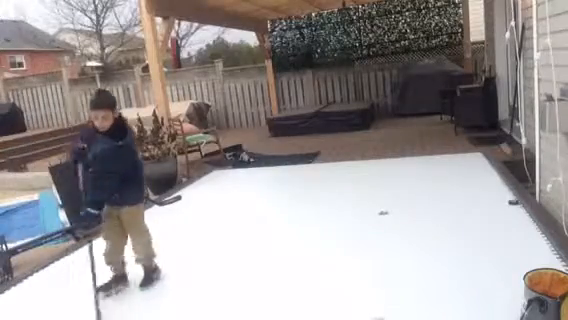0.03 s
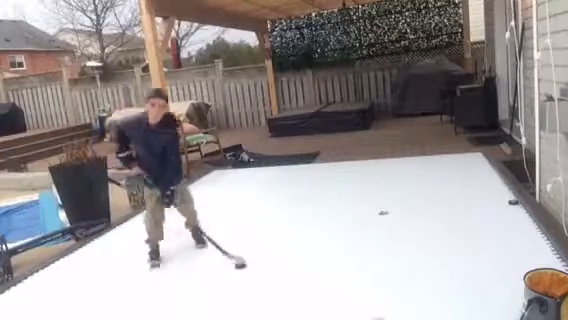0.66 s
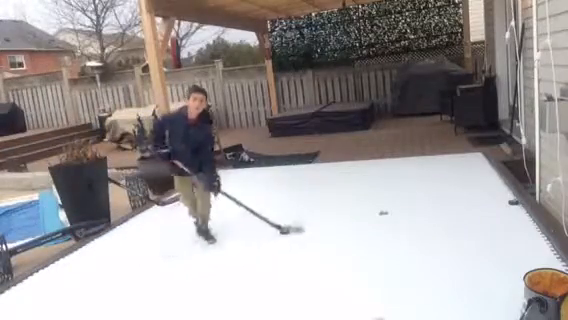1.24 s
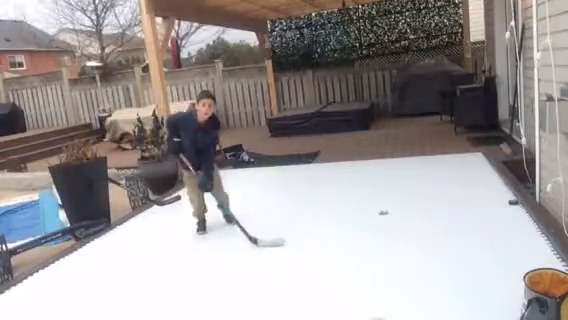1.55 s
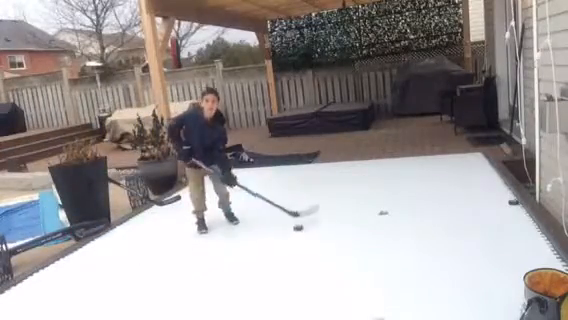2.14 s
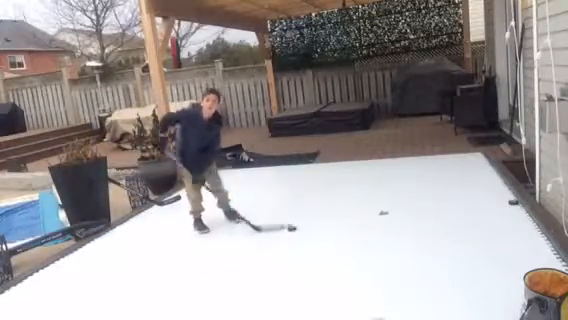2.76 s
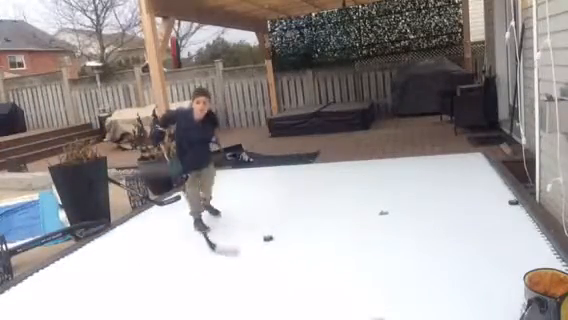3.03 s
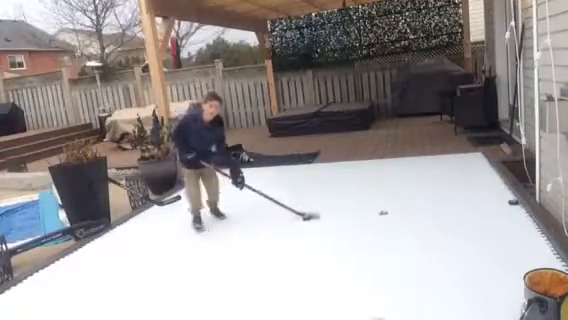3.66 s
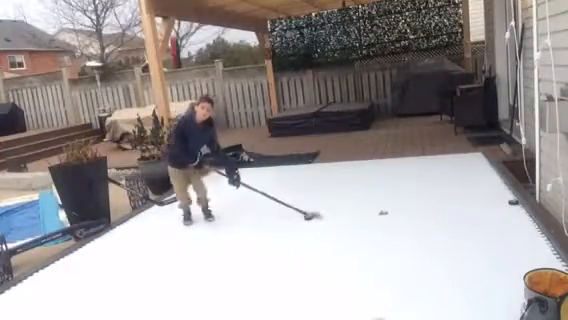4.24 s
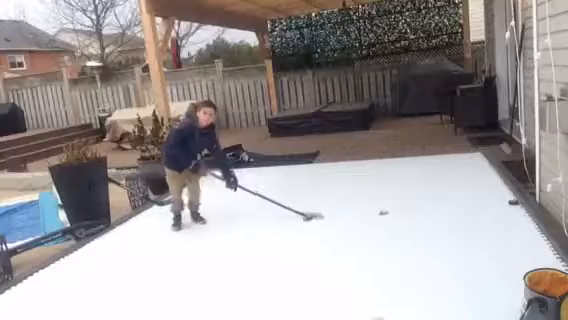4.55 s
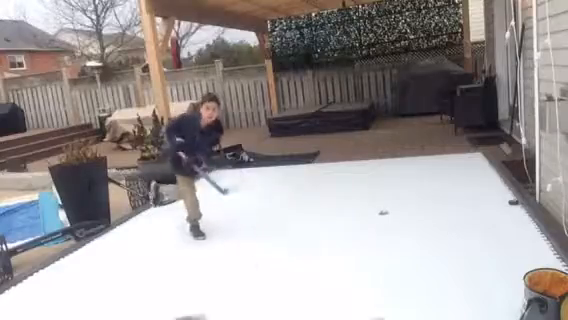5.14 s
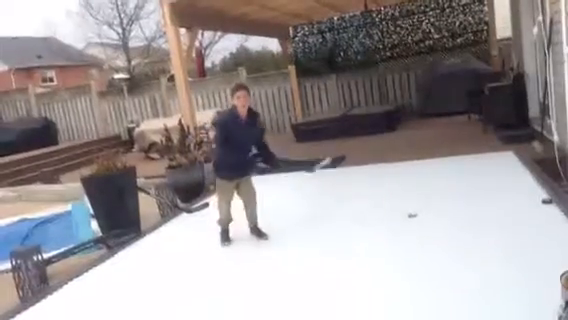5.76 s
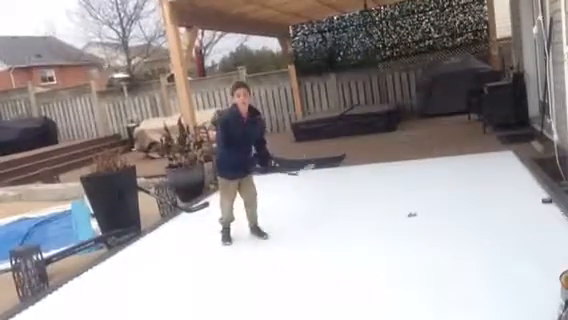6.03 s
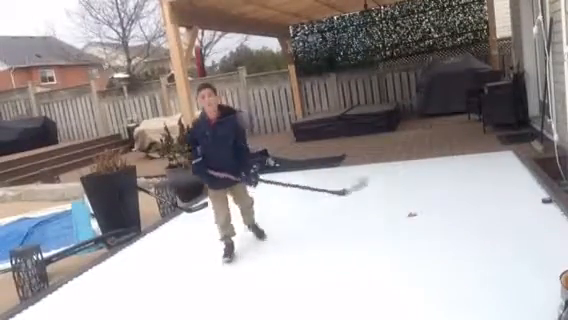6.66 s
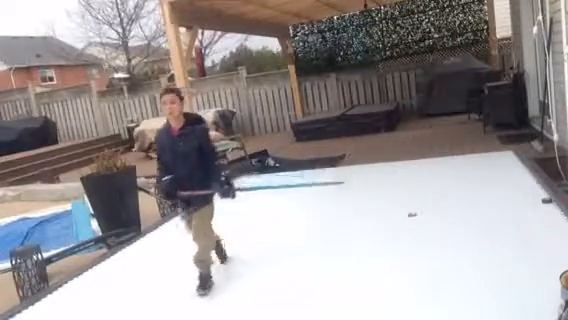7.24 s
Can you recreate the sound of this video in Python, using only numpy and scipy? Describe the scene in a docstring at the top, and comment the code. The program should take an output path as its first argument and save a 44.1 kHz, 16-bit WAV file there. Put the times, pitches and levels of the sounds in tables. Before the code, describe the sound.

A hockey stick knocks and scrapes a puck across a hollow plastic pad outdoors, then a shot bangs close by and shoes shuffle.

```python
"""A puck scrapes and knocks across a hollow plastic shooting pad in a backyard, swept along by a hockey
stick whose blade slaps the sheet. Each blow is a low thump and boom under a ringing knock and click.
A shot lands right by the microphone, which rattles; the puck bangs and bounces nearby, then shoes
shuffle. Gain control ducks the humming yard after loud blows, and a limiter holds the peaks."""
import sys
import numpy as np
from scipy import signal
from scipy.fft import rfft, irfft
from scipy.io import wavfile
from scipy.ndimage import uniform_filter1d, minimum_filter1d

SR = 44100
rng = np.random.default_rng(int(sys.argv[2]) if len(sys.argv) > 2 else 0)


def master(y):
    """Save y as 16-bit WAV."""
    cut = np.clip(np.atleast_2d(y).T, -1, 1)
    pcm = np.round(cut * 32767)  # scale
    wavfile.write(sys.argv[1], SR, pcm.astype(np.int16))


N = 326340
TIME = np.arange(N) / SR
AGE = np.arange(24576) / SR   # seconds into one blow
THUMP_TOP_HZ, BOOM_TOP_HZ, KNOCK_TOP_HZ = 125, 350, 3000   # the click lies above these three

# blade slaps: t/s, thump/dB, boom/dB, knock/dB, click/dB, ring length factor, knock centre/Hz
BLADE_SLAPS = [(0.548, -7.5, -2.5, -7, -12.5, 0.7, 940), (0.891, 1.5, 6.5, -1, -12.5, 0.69, 2400),
               (1.257, -4.5, -2.5, -3.5, -8, 1.13, 1030), (1.556, -1.5, -1, -9, -12, 1.42, 1450),
               (2.305, 1.5, 0, -2.5, -9, 1.02, 1140), (3.533, -16, -1.5, -8.5, -13.5, 1.02, 810),
               (3.602, -5, -4.5, -6, -10, 1.21, 910)]
# tone of the blade on the pad: f/Hz, level/dB
BLADE_COLOUR = [(350, -4), (420, 0), (530, 6), (720, -4.5), (1080, -6.5), (1600, -10), (2600, -18),
                (4500, -30.5), (7200, -26.5), (9600, -18), (12000, -26), (15500, -42)]
# resonances of blade and puck: f/Hz, width/Hz, relative level/dB
STICK_RINGS = [(517, 8.7, -13), (943, 31, -6), (1064, 31, -10), (1546, 7, -8.5), (1783, 24, -5),
               (2355, 51, -20), (2730, 30, -16), (3760, 38, -9), (4730, 54, -12), (5900, 58, -2.5),
               (9400, 91, -14), (10500, 140, -9)]
# low modes of the pad: f/Hz, relative level/dB, base t60/s, base swell/s
PAD_MODES = [(58.4, -17.5, 1, 0.067), (83.54, -1, 0.49, 0.025), (98.35, 0.5, 0.2, 0.067),
             (131.8, -3, 0.48, 0.012), (164.66, 2.5, 0.37, 0.033), (191.8, 4, 0.4, 0.018),
             (218.6, 1.5, 0.32, 0.021), (260.7, -1, 0.26, 0.022), (324.5, -4.5, 0.24, 0.0074)]
# rumble of the rubbed sheet: f/Hz, level/dB
RUMBLE_COLOUR = [(30, -10), (55, -5), (80, 8), (102, 12.5), (130, 0.5), (187, 14), (225, 7), (290, 0.5),
                 (400, -33)]


def blade_slaps():
    """The flat of the blade slaps the hollow pad and sets it booming."""
    return blows(BLADE_SLAPS, PAD_MODES, BLADE_COLOUR, STICK_RINGS, waver=0.051, attack_s=0.00087,
                 contact_db=-21, second_db=-11, echo_db=-16.5, tail_db=-33, tail_t60=0.75)


def heel_touches():
    """The heel of the blade clicks on the pad just before the whole blade slaps down."""
    lead_s, knock_trim_db, click_trim_db = 0.0078, -12.5, -15.5
    out = np.zeros(N)
    for s, _, _, knock_db, click_db, *_ in BLADE_SLAPS:
        burst = noise(BLADE_COLOUR, len(AGE)) * dying(t60=.15)
        knock = from_db(knock_db + knock_trim_db) * rms_one(knock_band(burst), .01)
        click = from_db(click_db + click_trim_db) * rms_one(click_band(burst), .01)
        add(out, s - lead_s, knock + click)
    return out


def puck_knocks():
    """The blade meets the hard puck with a sharp clack that also rings the pad."""
    # touches: t/s, thump/dB, boom/dB, knock/dB, click/dB, ring length factor, knock centre/Hz
    touches = [(0.14, -17, -13.5, -7, -17, 0.89, 905), (0.611, -9.5, -12, -10.5, -28.5, 0.91, 1400),
               (1.0, -14, -5, -2, -13, 1.23, 1310), (1.651, -19, -11, -4.5, -28, 0.39, 1720),
               (2.091, -13, -10.5, -6, -12.5, 1.4, 1170), (2.185, -27, -9, -18.5, -30, 0.89, 262),
               (2.452, -20.5, -27.5, -18.5, -40, 1, 1190), (3.372, -14, -10, -4.5, -28.5, 1.5, 770),
               (3.679, -10, -12.5, -7.5, -46, 0.54, 696), (4.716, -18, -16, -6, -54, 0.5, 655),
               (4.982, -7.5, -9.5, -14, -16, 1.28, 1950), (5.055, -24, -17, -11.5, -40, 0.46, 1550)]
    # tone of the clack: f/Hz, level/dB
    puck_colour = [(350, 12.5), (440, -11), (535, 5.5), (720, -6), (1050, -5), (1700, -8), (2600, -14),
                   (4000, -20.5), (7000, -20.5), (9300, -10.5), (12000, -23), (15500, -39)]
    return blows(touches, PAD_MODES, puck_colour, STICK_RINGS, waver=0.05, attack_s=0.00022,
                 contact_db=-6.5, second_db=-3.5, echo_db=-15.5, tail_db=-22, tail_t60=0.8)


def sliding():
    """Fine grit rubs and hisses under blade and puck; the sheet rumbles below."""
    # tone of the friction: f/Hz, level/dB
    slide_colour = [(350, 11.5), (440, 10), (540, 11), (800, 1.5), (1080, 6.5), (1350, 5.5), (2000, -0.5),
                    (3200, -9.5), (5000, -17), (7200, -15), (9500, -8), (11500, -16), (13500, -27),
                    (15500, -28)]
    ring_db, wander_db, judder_db = 2, 6.5, 2.5
    rumble, rub, hiss = slide_gains()
    grit = noise(slide_colour)
    # as the contact wanders along the blade, each resonance swells and fades on its own
    rings = sum((ringing(grit, [ring]) - grit) * from_db(wander_db * drift(16)) for ring in STICK_RINGS)
    grit = reflected(grit + from_db(ring_db) * rings, echo_db=-17.5)
    # the pad's own reflection arrives a little earlier or later as the blade moves
    lag_s = 0.001091 * from_db(1.41 * drift(7))
    grit = grit + from_db(-9) * np.interp(TIME - lag_s, TIME, grit)
    friction = rub * rms_one(knock_band(grit)) + hiss * rms_one(click_band(grit))
    sheet = rumble * rms_one(noise(RUMBLE_COLOUR))
    return friction * from_db(judder_db * drift(60)) + sheet


def slide_gains():
    """Strength of rumble, rub and hiss: the sweeps and the gliding puck add up in power."""
    # blade sweeps: fastest at t/s, swell/s, fade/s, rumble/dB, rub/dB, hiss/dB
    sweeps = [(0.132, 0.061, 0.098, -33, -18.5, -19.5), (0.309, 0.21, 0.18, -8, -20.5, -22.5),
              (0.53, 0.12, 1, -19.5, -48, -34.5), (0.98, 0.04, 0.42, -35, -36, -28),
              (1.45, 0.13, 0.38, -24.5, -45, -40), (2.06, 0.29, 0.9, -42, -33.5, -45.5),
              (2.794, 0.1, 0.098, -34, -19, -26), (2.988, 0.23, 0.19, -18, -23.5, -22.5),
              (3.335, 0.16, 0.57, -26, -29.5, -30), (4.839, 0.13, 0.27, -7.5, -16, -19),
              (4.99, 0.2, 0.062, -24, -22, -12.5), (5.54, 0.14, 0.13, -24, -48, -24.5)]
    # the gliding puck at the start: rumble/dB, rub/dB, hiss/dB
    glide_db = (-22.5, -28.5, -38)
    slowing_db_per_s, trapped_s = 5, 4.1
    glide = from_db(-slowing_db_per_s * TIME) * (TIME < trapped_s)
    slides = [(stroke(s, swell_s, fade_s), levels_db) for s, swell_s, fade_s, *levels_db in sweeps]
    slides.append((glide, glide_db))
    return np.sqrt(sum(np.outer(from_db(levels_db), shape) ** 2 for shape, levels_db in slides))


def shot_impacts():
    """The shot bangs into its target, and the puck bounces close by."""
    # impacts: t/s, thump/dB, boom/dB, knock/dB, click/dB, ring length factor, knock centre/Hz
    impacts = [(5.353, -3, -6.5, -26, -24.5, 0.96, 485), (5.41, -10, -4.5, -13, -27, 2.3, 550),
               (5.448, 1.5, -6, -13, -25.5, 0.65, 586), (5.599, -9, 0.5, -7.5, -46, 0.57, 232),
               (5.675, -34, -17.5, -29, -58, 0.36, 350), (5.772, -9.5, -6.5, -1, -5.5, 1.24, 1780),
               (5.815, -18, -8.5, -6.5, -15, 1.1, 1020), (5.848, -28, -17, -10, -15, 1.86, 1140),
               (5.984, -4, 1.5, -2.5, -13.5, 1.09, 774), (6.195, -15.5, -12, -25.5, -42.5, 1, 1600),
               (6.297, -28, -8, -15, -32, 0.97, 1300), (6.315, -17, -8, -12.5, -24.5, 0.52, 1700),
               (6.375, -15, -6, -15.5, -30, 0.41, 1200), (6.393, -16, -7.5, -11.5, -25, 0.53, 1200),
               (6.428, -11.5, -16, -11, -28.5, 0.72, 705), (6.445, -17, -4.5, -21, -43, 1.07, 970)]
    # low modes of the target: f/Hz, relative level/dB, base t60/s, base swell/s
    target_modes = [(51.1, -9, 0.48, 0.033), (63.7, -2, 0.32, 0.056), (82.4, -9, 0.98, 0.016),
                    (114, -11, 0.69, 0.0033), (152.6, 1.5, 0.46, 0.026), (187.8, 3, 0.44, 0.026),
                    (225.5, 2, 0.32, 0.00083), (280.6, -8, 0.32, 0.004), (331, -17.5, 0.52, 0.0013)]
    # resonances of the target: f/Hz, width/Hz, relative level/dB
    target_rings = [(422, 20, 1.5), (494, 72, -6), (680, 88, 0.5), (970, 120, 2), (1224, 25, 6),
                    (1439, 17, 1), (2070, 49, -3.5), (2470, 30, -8), (2860, 78, 4), (3690, 63, -0.5),
                    (4600, 83, -4), (5500, 57, -8), (8030, 240, -3), (9060, 130, -7)]
    # tone of the bang: f/Hz, level/dB
    shot_colour = [(350, 4.5), (520, 6), (900, -4), (1400, -6), (2400, -7.5), (3200, -18.5), (4600, -20.5),
                   (7000, -26.5), (9000, -17), (11500, -29.5), (15500, -43)]
    return blows(impacts, target_modes, shot_colour, target_rings, waver=0.048, attack_s=0.00038,
                 contact_db=2, second_db=-15, echo_db=-18, tail_db=-27.5, tail_t60=0.86)


def microphone_rattle():
    """Dry ticks carried straight into the shaken microphone, with no air or echo."""
    # ticks: t/s, knock/dB, click/dB
    ticks = [(5.329, -23, -29), (5.354, -17.5, -19), (5.361, -5, -34), (5.37, -11, -14), (5.378, -5.5, -18),
             (5.391, 2, -30), (5.411, -1.5, -28), (5.432, -11, -28), (5.541, -4.5, -35),
             (5.724, -26.5, -57)]
    # tone of a tick: f/Hz, level/dB
    tick_colour = [(350, 6.5), (700, -3.5), (1200, -20), (2500, -27.5), (7000, -22), (9300, -10),
                   (12000, -17), (15500, -29)]
    out = np.zeros(N)
    for s, knock_db, click_db in ticks + chatter():
        burst = noise(tick_colour, len(AGE))
        knock = from_db(knock_db) * rms_one(knock_band(burst * dying(t60=.051)), .005)
        click = from_db(click_db) * rms_one(click_band(burst * dying(t60=.006)), .005)
        add(out, s, knock + click)
    return out


def chatter(count=6, start_s=5.442, gap_s=.0064, knock_db=-9, click_db=-21, rise_db=2, spread_db=2.5):
    """The shaking breaks into a quick, uneven, brightening run of ticks: t/s, knock/dB, click/dB."""
    return [(start_s + gap_s * (k + .15 * late),
             knock_db + spread_db * knock,
             click_db + rise_db * k + spread_db * click)
            for k, (late, knock, click) in enumerate(rng.standard_normal((count, 3)))]


def shoe_scuffs():
    """Shoes bump the pad with a soft attack and a short tail."""
    # scuffs: t/s, thump/dB, boom/dB, knock/dB, click/dB, ring length factor, knock centre/Hz
    scuffs = [(4.06, -28.5, -36, -64, -47, 1, 1013), (4.472, -25.5, -42, -37, -62, 0.52, 806),
              (7.088, -45, -32.5, -56, -30, 1.18, 1000), (7.232, -29, -27, -34, -48.5, 0.41, 1510),
              (7.28, -27, -25.5, -54, -66, 0.63, 700)]
    # tone of a scuff: f/Hz, level/dB
    scuff_colour = [(350, 11), (1100, -21), (2500, -7), (5000, -9), (7000, 4), (9200, 1.5), (12000, -20),
                    (15500, -28)]
    return blows(scuffs, PAD_MODES, scuff_colour, STICK_RINGS[:3], waver=0.0434, attack_s=0.0025,
                 contact_db=-26, second_db=0, echo_db=-10, tail_db=-20, tail_t60=0.13)


def shoe_drags(swell_share=0.51, grain_db=2, rumble_db=-0.5):
    """Rubber soles hiss and squeak faintly on the plastic, which rumbles under them."""
    # drags: fastest at t/s, fade/s, level/dB
    drags = [(0.72, 0.27, -34.5), (3.89, 0.23, -33.5), (4.08, 0.12, -39), (4.335, 0.088, -42.5),
             (4.44, 0.12, -39), (4.56, 0.092, -39.5), (4.675, 0.058, -41.5), (6.79, 0.064, -45.5),
             (6.91, 0.069, -36)]
    # hiss of the soles: f/Hz, level/dB
    sole_colour = [(350, -9), (1500, -11), (2500, -3.5), (5000, -2), (7500, -1.5), (9300, 4.5), (11500, -9),
                   (15500, -19)]
    # squeak resonances: f/Hz, width/Hz, relative level/dB
    squeaks = [(3100, 120, 0), (3960, 150, -8), (6300, 130, 0)]
    power = sum((from_db(db) * stroke(s, swell_share * fade_s, fade_s)) ** 2 for s, fade_s, db in drags)
    grit = coloured(rng.standard_normal(N) * from_db(grain_db * drift(180)), sole_colour)
    sheet = from_db(rumble_db) * rms_one(noise(RUMBLE_COLOUR))
    return np.sqrt(power) * (rms_one(ringing(grit, squeaks)) + sheet)


def wall_echoes(x):
    """The house wall and the fence each throw back a quick slap."""
    # echoes: delay/s, level/dB
    echoes = [(0.0237, -19), (.051, -18.5)]
    return sum(from_db(db) * delayed(x, delay_s) for delay_s, db in echoes)


def yard(level_db=-30.5):
    """The steady hum of a suburb far off."""
    # tone of the hum: f/Hz, level/dB
    yard_colour = [(25, -9), (45, -2), (90, 9), (125, 0.5), (185, 3), (280, -5), (400, -10), (500, -4.5),
                   (800, -10.5), (1020, -7.5), (1300, -15), (2150, -18), (2800, -30.5), (7000, -35.5),
                   (9100, -28.5), (15500, -50)]
    return from_db(level_db) * rms_one(noise(yard_colour))


def blows(events, modes, colour, rings, waver, **crack_shape):
    """Every blow rings the body's low modes under its own crack."""
    out = np.zeros(N)
    for s, *levels_db, length, centre_hz in events:
        thump, boom = low_ring(modes, length, centre_hz, waver)
        knock, click = crack(colour, rings, length, centre_hz, **crack_shape)
        add(out, s, from_db(levels_db) @ np.array([thump, boom, knock, click]))
    return out


def low_ring(modes, length, centre_hz, waver):
    """Thump and boom: bending waves are slow, so the low modes swell after the contact."""
    thump, boom = 0, 0
    for hz, db, t60, swell_s in modes:
        # the pitch depends on where the sheet is struck, and wavers as it flaps
        pitch_hz = hz * (1 + 0.0266 * rng.standard_normal() + waver * drift(44.3, len(AGE)))
        cycles = np.cumsum(pitch_hz) / SR + rng.random()
        swell = 1 - np.exp(-(AGE / (swell_s * length)) ** 2)
        makeup_db = 60 * swell_s / t60   # offsets the decay during the swell
        gain = from_db(db + makeup_db + at_hz(stress(centre_hz), hz))
        mode = gain * swell * dying(t60 * length) * np.sin(2 * np.pi * cycles)
        if hz < THUMP_TOP_HZ:
            thump += mode
        else:
            boom += mode
    return rms_one(thump, .11), rms_one(boom, .09)


def crack(colour, rings, length, centre_hz, attack_s, contact_db, second_db, echo_db, tail_db, tail_t60):
    """Knock and click: a brief double contact, dense dying modes, then scatter from fence and house."""
    # how fast a blow dies: f/Hz, base t60/s
    decay_times = [(400, 0.26), (1200, 0.2), (3500, 0.2), (10000, 0.22), (15000, 0.052)]
    lift_db, spread_db, grain_db = 3, 4, 2.12
    second_touch = np.exp(-((AGE - rng.uniform(0.0011, 0.018)) / 0.013) ** 2)
    contact = from_db(contact_db) * (dying(t60=0.0078) + from_db(second_db) * second_touch)
    scatter = from_db(tail_db) * dying(tail_t60)
    onset = 1 - np.exp(-AGE / attack_s)
    # where the blow lands decides how strongly each resonance answers
    rings = [(hz, width_hz, db + lift_db + spread_db * np.clip(rng.standard_normal(), -1.5, 1.5))
             for hz, width_hz, db in rings]
    edges_hz = [BOOM_TOP_HZ, 900, KNOCK_TOP_HZ, SR]
    parts = []
    for low, high in zip(edges_hz, edges_hz[1:]):
        grain = from_db(grain_db * drift(603, len(AGE)))
        burst = coloured(rng.standard_normal(len(AGE)) * grain, colour)
        if high <= KNOCK_TOP_HZ:
            burst = coloured(burst, stress(centre_hz))
        body = dying(length * at_hz(decay_times, np.sqrt(low * high)))
        burst = band(burst * onset * (contact + body + scatter), low, high)
        parts.append(reflected(ringing(burst, rings), echo_db))
    low_knock, high_knock, click = parts
    return rms_one(low_knock + high_knock, .03), rms_one(click, .03)


def stress(centre_hz):
    """The harder the contact, the higher the pitch that it stresses: f/Hz, level/dB."""
    return [(centre_hz / 2, -1), (centre_hz, 7), (centre_hz * 2, 0), (centre_hz * 4, -9)]


def ringing(x, rings):
    """Narrow resonances sing on top of the contact noise."""
    out = x
    for hz, width_hz, db in rings:
        radius = np.exp(-np.pi * width_hz / SR)
        poles = [1, -2 * radius * np.cos(2 * np.pi * hz / SR), radius ** 2]
        out = out + from_db(db) * signal.lfilter([1, 0, -1], poles, x) * (1 - radius ** 2) / 2
    return out


def reflected(x, echo_db):
    """A close reflection gives the sound a hollow, comb-like colour."""
    return x + from_db(echo_db) * delayed(x, seconds=.00368)


def stroke(s, swell_s, fade_s):
    """A slide gains 20 dB in swell_s up to its fastest moment, then loses 20 dB in fade_s."""
    return from_db(-20 * np.maximum((s - TIME) / swell_s, (TIME - s) / fade_s))


def dying(t60):
    """An envelope that falls 60 dB in t60 seconds."""
    return from_db(-60 * AGE / t60)


def drift(rate, size=N):
    """A random wander with a spread near 1, turning rate times a second."""
    knots = rng.standard_normal(4096)
    return np.interp(np.arange(size) / SR * rate, np.arange(len(knots)), knots)


def noise(colour, size=N):
    """Steady noise of a given colour."""
    return coloured(rng.standard_normal(size), colour)


def coloured(x, colour):
    """Shape a sound with an EQ curve."""
    hz = np.fft.rfftfreq(len(x), 1 / SR)
    return irfft(rfft(x) * from_db(at_hz(colour, hz)), len(x))


def at_hz(points, hz):
    """Read a table on a log-frequency axis."""
    known_hz, values = np.transpose(points)
    return np.interp(np.log(np.maximum(hz, 1)), np.log(known_hz), values)


def band(x, low_hz, high_hz):
    """A band-pass with soft edges that add up in power."""
    edges = [low_hz, min(high_hz, .45 * SR)]
    return signal.sosfilt(signal.butter(5, edges, "band", fs=SR, output="sos"), x + 1e-18)


def knock_band(x):
    """The mids, where blows knock and slides rub."""
    return band(x, BOOM_TOP_HZ, KNOCK_TOP_HZ)


def click_band(x):
    """The treble, where blows click and slides hiss."""
    return band(x, KNOCK_TOP_HZ, SR)


def delayed(x, seconds):
    """The same sound, arriving later."""
    lag = round(seconds * SR)
    return np.concatenate([np.zeros(lag), x[:-lag]])


def from_db(db):
    """Decibels to amplitude."""
    return 10 ** (np.asarray(db) / 20)


def rms_one(x, seconds=None):
    """Scale to rms 1, over the whole or over the first seconds."""
    head = x if seconds is None else x[:int(seconds * SR)]
    return x / np.sqrt(np.mean(head ** 2) + 1e-20)


def add(track, s, sound):
    """Mix a sound in at time s."""
    at = round(s * SR)
    track[at:at + len(sound)] += sound[:N - at]


def gain_control(x, threshold_db, most_db, hold_s, release_db_per_s):
    """Loud sound turns the gain down; it waits, then creeps back, so the yard sinks after a blow."""
    level_db = 10 * np.log10(np.abs(uniform_filter1d(x ** 2, size=882)) + 1e-12)
    duck_db = np.clip(level_db - threshold_db, 0, most_db)
    half = int(hold_s * SR / 2)
    held_db = -minimum_filter1d(-duck_db, size=2 * half + 1, origin=half, mode="constant")
    return x * from_db(-uniform_filter1d(released(held_db, release_db_per_s), size=220))


def limiter(x, ceiling, release_db_per_s):
    """The gain ducks just ahead of each peak and climbs back."""
    over_db = np.maximum(20 * np.log10(np.abs(x) / ceiling + 1e-9), 0)
    gain_db = minimum_filter1d(-released(over_db, release_db_per_s), size=45)
    return x * from_db(uniform_filter1d(gain_db, size=45))


def released(duck_db, db_per_s):
    """Gain reduction bites at once and lets go at a steady rate."""
    ramp = db_per_s * TIME
    return np.maximum.accumulate(duck_db + ramp, axis=-1) - ramp


def scene():
    """Stick handling with its wall echoes, the shot close by, shoes and the yard, in mono."""
    handling = blade_slaps() + puck_knocks()
    nearby = shot_impacts() + shoe_scuffs() + microphone_rattle()
    handling += heel_touches() + sliding()
    return (handling + wall_echoes(handling) + nearby + shoe_drags() + yard())[None]


def record(dry):
    """The gain rides the level, peaks are limited, the top is cut."""
    cutoff_hz = 15900
    ridden = gain_control(dry, threshold_db=-12, most_db=8, hold_s=.21, release_db_per_s=42)
    limited = limiter(ridden, ceiling=0.9, release_db_per_s=239)
    return signal.sosfilt(signal.ellip(10, .2, 80, cutoff_hz, fs=SR, output="sos"), limited)


dry = scene()
out = record(dry)
master(out)
```